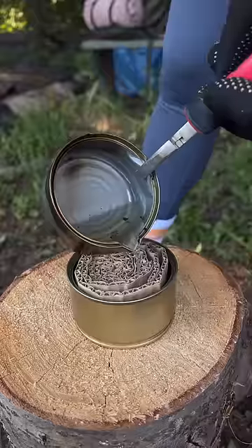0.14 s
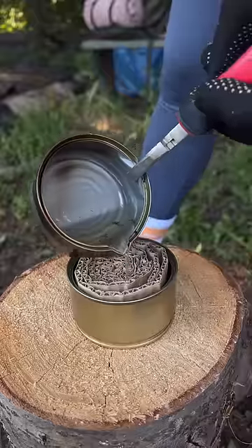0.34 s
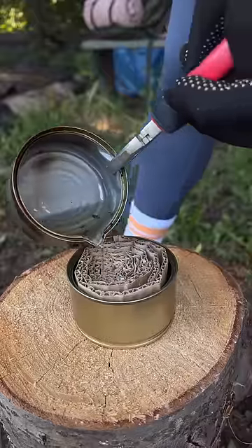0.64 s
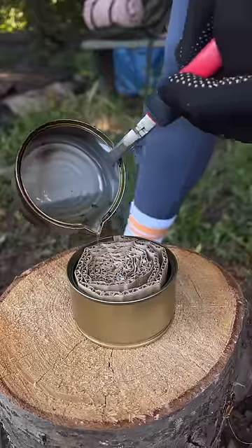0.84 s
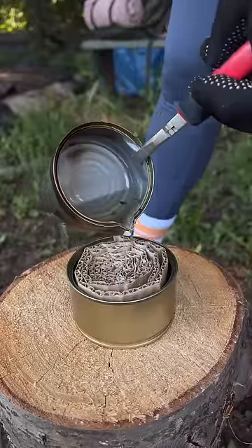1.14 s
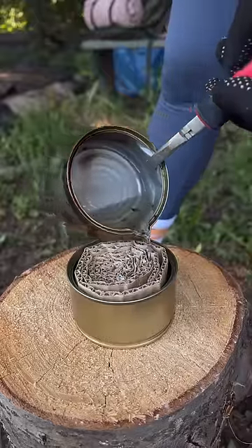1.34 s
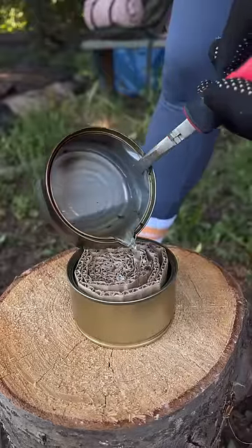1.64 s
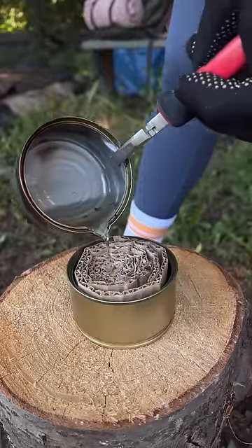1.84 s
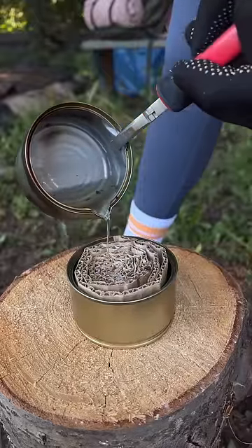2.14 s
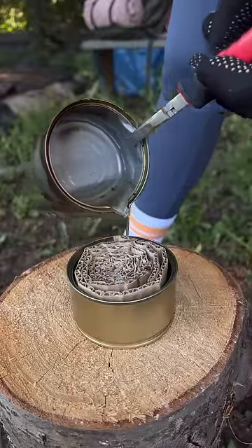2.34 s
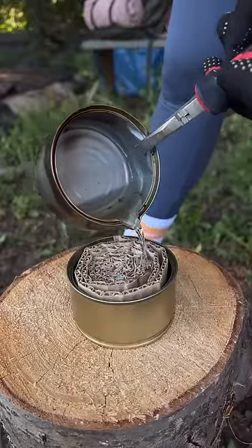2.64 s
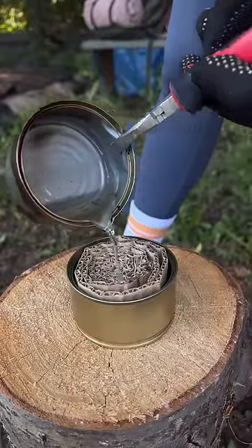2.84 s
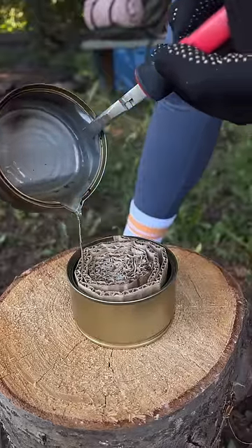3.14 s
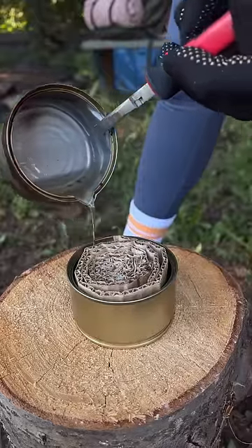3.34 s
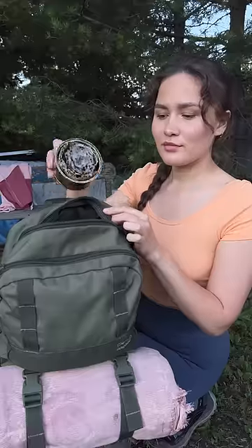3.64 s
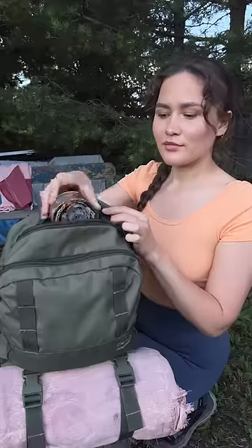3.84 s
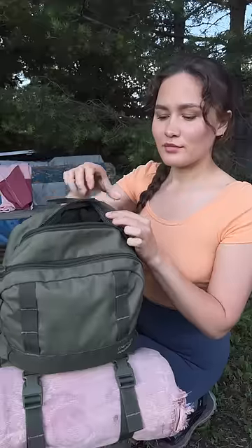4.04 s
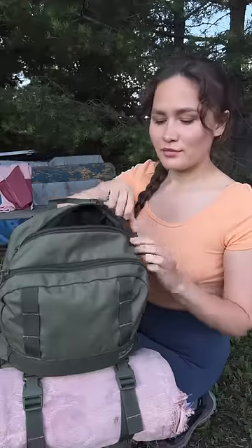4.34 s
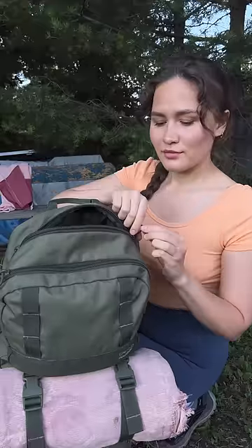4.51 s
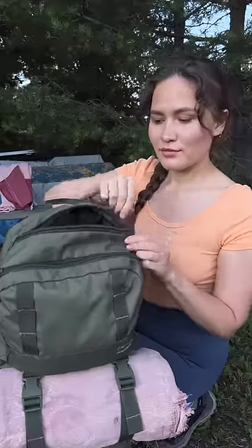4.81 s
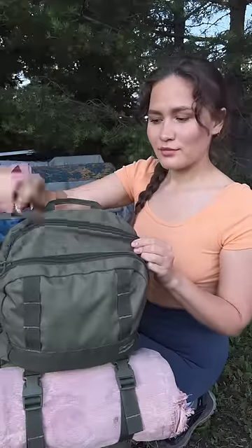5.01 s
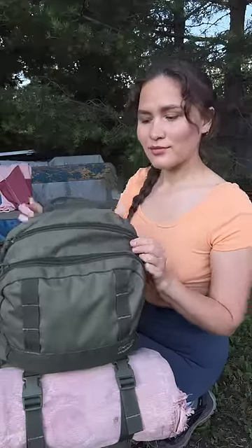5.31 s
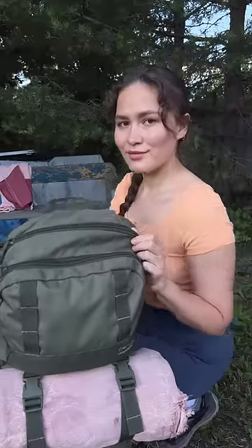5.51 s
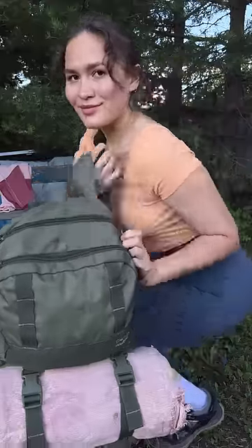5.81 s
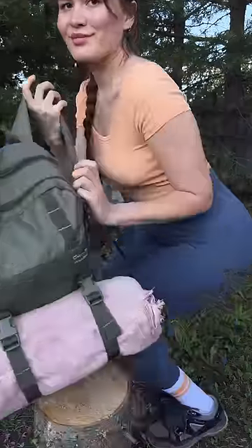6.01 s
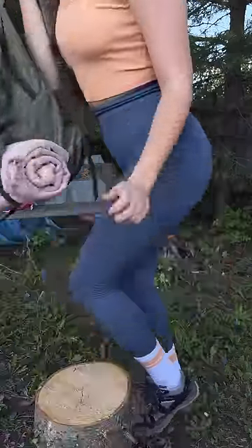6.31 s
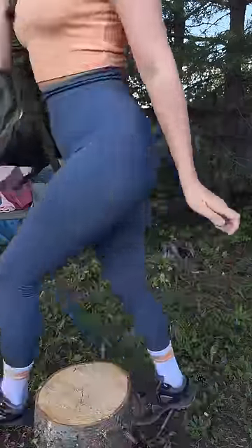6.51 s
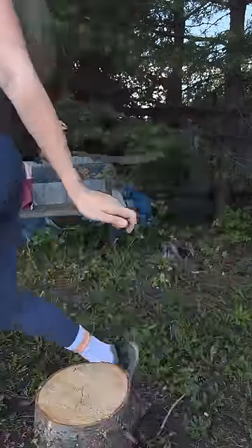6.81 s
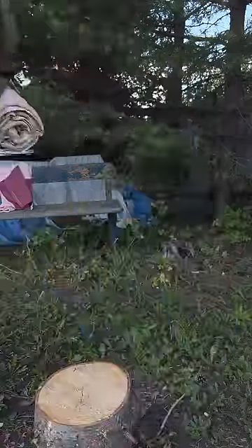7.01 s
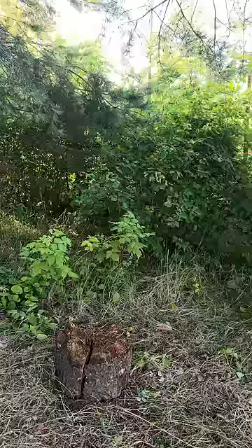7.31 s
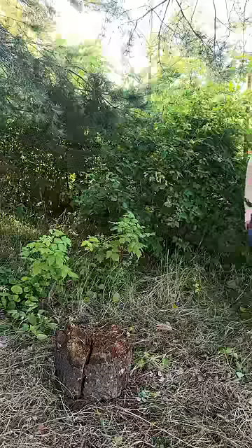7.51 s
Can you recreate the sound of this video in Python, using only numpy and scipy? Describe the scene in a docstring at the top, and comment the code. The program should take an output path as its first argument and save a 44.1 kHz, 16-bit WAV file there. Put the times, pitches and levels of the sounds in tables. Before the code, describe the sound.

A close mono microphone in a quiet garden. For the first three seconds there is mostly soft air, a very low faint hum and small birds: thin chips, downward slurs and short whistles, with farther calls behind. At about 1.35-1.5 s a pot's spout scrapes lightly on cardboard, gritty then ringing; tiny metal taps come near 2.8 s. A slightly higher distant hum joins from 3.5 s. Light handling begins at 3.8 s, and at 4.06 s a tin drops into the pack: the loudest event, a short cushioned thud with slight clatter. Birds chip again. Bumps at 4.7-4.85 s lead to a quick zipper at 4.88-5.12 s, rising in pitch and ending with a click. Birds whistle until 5.8 s. Nylon rubs, then around 5.9-6.0 s the strap drags and buckles knock as the pack lifts. Rustles, thumps and taps continue to 7.3 s with grass swishes; a twig snaps sharply at 7.58 s.

```python
"""Small birds in a quiet garden, then close to the microphone a pot's spout scrapes briefly over
cardboard as wax is poured. A tin drops into a backpack, the zipper is pulled shut, and the pack is
lifted and carried, rustling and knocking; at the end, in the woods, dry grass swishes and a twig snaps.
Random slips and struck resonances make the rubbing and the blows, tooth ticks the zipper, gliding
sines the birds, and filtered noise with low hums the air."""
import sys
import numpy as np
from scipy import signal
from scipy.fft import rfft, irfft, next_fast_len
from scipy.io import wavfile

SR = 44100
rng = np.random.default_rng(int(sys.argv[2]) if len(sys.argv) > 2 else 0)


def waveform_to_disk(signal):
    """Save audio, clipped to [-1, 1], as 16-bit WAV at the path in sys.argv[1]."""
    frames = np.transpose(np.atleast_2d(signal))
    scaled = np.clip(frames, -1, 1) * 32767
    samples = np.round(scaled).astype(np.int16)
    wavfile.write(sys.argv[1], SR, samples)


N = 337794
T = np.arange(N) / SR


def from_db(db):
    """Amplitude factor for a level in dB."""
    return 10 ** (np.asarray(db) / 20)


def rms_one(x):
    """Scale a signal to an RMS of 1."""
    return x / np.sqrt(np.mean(x ** 2) + 1e-20)


def level(s, db):
    """Gain along a dB curve, practically silent outside it."""
    return from_db(np.interp(T, s, db, left=-150, right=-150))


def add(out, s, sound):
    """Mix a short sound in at time s."""
    at = max(round(s * SR), 0)
    out[at:at + len(sound)] += sound[:max(N - at, 0)]


def drift(rate):
    """Smooth chance with an RMS of 1, from random knots at a rate per second."""
    knots = np.arange(0, 9, 1 / rate)
    return rms_one(np.interp(T, knots, rng.standard_normal(len(knots))))


def stroke(start, end, attack_s, release_s):
    """Gain that rises by 60 dB per attack up to the start, holds, and falls by 60 dB per release."""
    before = np.maximum((start - T) / attack_s, 0)
    after = np.maximum((T - end) / release_s, 0)
    return from_db(-60 * np.minimum(before + after, 3))


def sway(s, length):
    """Half a sine that starts at s and lasts for length; zero outside."""
    out = np.zeros(N)
    add(out, s, np.sin(np.linspace(0, np.pi, max(int(length * SR), 2))))
    return out


def resonate(x, hz, width_hz):
    """A two-pole resonance with a gain of about 1 at its top."""
    r = np.exp(-np.pi * width_hz / SR)
    feed = np.array([1, 0, -1]) * (1 - r * r) / 2
    feedback = [1, -2 * r * np.cos(2 * np.pi * hz / SR), r * r]
    return signal.lfilter(feed, feedback, x + 1e-18)


def colour(x, spectrum):
    """Causal (minimum-phase) filter that follows a spectrum of (Hz, dB) points."""
    size = 2 * next_fast_len(len(x))
    hz, db = np.transpose(spectrum)
    bins = np.maximum(np.fft.rfftfreq(size, 1 / SR), 1)
    gain = from_db(np.interp(np.log(bins), np.log(hz), db))
    # folding the cepstrum on to positive times gives the minimum phase
    cepstrum = irfft(np.log(gain))
    cepstrum[1:size // 2] *= 2
    cepstrum[size // 2 + 1:] = 0
    return irfft(rfft(x, size) * np.exp(rfft(cepstrum)))[:len(x)]


def friction(per_s, spread_db):
    """Rubbing as countless tiny slips of uneven size at random moments."""
    sizes = from_db(spread_db * np.minimum(rng.exponential(1, N), 4))
    slipping = rng.random(N) < per_s / SR
    return rms_one(rng.standard_normal(N) * sizes * slipping)


# the hand pulls the zipper: time_s [s], teeth_per_s [1/s], rasp_db [dB]
ZIP_PULL = [(4.877, 190, -48), (4.897, 255, -38.5), (4.928, 415, -29), (4.955, 484, -30), (4.979, 480, -26),
            (4.991, 513, -38), (5.015, 533, -31), (5.026, 600, -30.5), (5.066, 570, -31.5),
            (5.102, 340, -32.5), (5.122, 160, -70)]
# colour of the teeth's rasp: freq_hz [Hz], level_db [dB, relative]
RASP_SPECTRUM = [(820, -35), (1400, 4.5), (1770, -5), (2400, 1.5), (2710, -5), (3000, -5.5), (9050, -9.5),
                 (10900, -17), (15800, -9.5)]
# the fabric swings harder with speed, until the slider rounds the bend and the flap is held
SWING_DB, OCTAVE_DB, FULL_TEETH_PER_S = -15, -26, 430
SWING_DB_PER_OCTAVE, OCTAVE_DB_PER_OCTAVE = 16.5, 5.5
BEND_S, BEND_TAKES_S, HELD_SWING_DB, OCTAVE_FADE_DB_PER_S = 4.96, .028, -20.5, 73


def zipper(jitter=.03, flutter_db=3.0, scratch_db=-6, fabric_db=2, fabric_hz=600):
    """The slider meets the teeth at a rate set by its speed: the fabric swings and each tooth ticks."""
    s, rate, rasp_db = np.transpose(ZIP_PULL)
    per_s = np.interp(T, s, rate)
    teeth = np.cumsum(per_s * (1 + jitter * drift(250))) / SR
    speed = np.minimum(np.log2(per_s / FULL_TEETH_PER_S), 0)   # octaves below full speed
    past_bend = np.maximum(T - BEND_S, 0)
    held = np.minimum(past_bend / BEND_TAKES_S, 1)
    swing_db = SWING_DB + SWING_DB_PER_OCTAVE * speed + HELD_SWING_DB * held
    octave_db = OCTAVE_DB + OCTAVE_DB_PER_OCTAVE * speed - OCTAVE_FADE_DB_PER_S * past_bend
    # the fabric's tone: the tooth rate and its octave
    tone = 0
    for k, db in enumerate([swing_db, octave_db], 1):
        flutter = from_db(flutter_db * drift(200) * (k / 2))
        tone = tone + from_db(db) * np.sqrt(2) * np.sin(2 * np.pi * k * teeth) * flutter
    # each tooth engages a little early or late, and with a force of its own
    engaged = np.maximum.accumulate(np.floor(teeth + .04 * drift(500)))
    force = from_db(3 * drift(500) - 1) / np.sqrt(per_s / SR)
    ticks = np.diff(engaged, prepend=0) * force
    # noise that fades from each tooth to the next
    scratch = rms_one(rng.standard_normal(N) * np.exp(-2.5 * (teeth % 1)))
    rasp = rms_one(colour(ticks + from_db(scratch_db) * scratch, RASP_SPECTRUM))
    fabric = from_db(fabric_db) * rms_one(resonate(scratch, fabric_hz, 870))
    pull = stroke(s[0], s[-1], attack_s=.02, release_s=.06)
    return tone * pull + level(s, rasp_db) * (rasp + fabric) + end_stop()


# ringing of the small metal pull: pitch_hz [Hz], level_db [dB], t60_s [s]
PULL_RINGS = [(3840, -25.5, .014), (5360, -23.5, 0.026), (11240, -19, 0.023), (14400, -34, .025)]
STOP_S = 5.1005


def end_stop():
    """The slider hits its end stop and the small metal pull rings for a moment."""
    out, t = np.zeros(N), T[:SR // 10]
    ring = sum(from_db(db - 60 * t / t60) * np.sin(2 * np.pi * hz * t) for hz, db, t60 in PULL_RINGS)
    add(out, STOP_S, ring)
    return out


# level of the rustle of the handled pack, and at the end of faint rustling in the woods:
# time_s [s], level_db [dB]
RUSTLE_LEVEL = [(3.55, -93), (3.87, -54), (4.1, -56), (4.7, -54.5), (5.131, -51), (5.4, -53.5),
                (5.68, -47.5), (5.95, -35.5), (6.17, -44.5), (6.45, -45.5), (6.6, -50.5), (6.9, -38),
                (7.0, -46), (7.13, -42), (7.22, -55.5), (7.66, -63)]
# colour of nylon against the body: freq_hz [Hz], level_db [dB, relative]
CLOTH_SPECTRUM = [(45, -38), (80, 2.5), (180, 2.5), (400, 6.5), (520, -3), (720, -1), (1500, -9.5),
                  (2500, -13), (4000, -47)]
# colour of nylon sliding on nylon: freq_hz [Hz], level_db [dB, relative]
SLIDING_SPECTRUM = [(880, 0), (1500, -0.5), (2160, -6), (2710, -2), (4180, -2.5), (5240, -9), (6710, -8.5),
                    (14700, -20), (15800, -28)]
# colour of the dragging strap: freq_hz [Hz], level_db [dB, relative]
STRAP_SPECTRUM = [(47, -55), (80, -14), (107, -16), (181, -10.5), (276, -2), (640, -6.5), (891, -5),
                  (974, -9.5), (1660, -12), (1770, -2), (1930, -11.5), (2630, -16), (5350, -30.5),
                  (6380, -32), (15800, -46)]
# the strap drags taut as the pack is lifted
HEAVE_S, HEAVE_END_S, HEAVE_DB = 5.902, 6.012, -25.5


def rustling(body_db=-1, swish_db=-7, catch_db=1.2, crease_db=-6):
    """Nylon catches and slides, creases pop, the strap drags under the weight; faint rustling ends it."""
    pops = resonate(friction(per_s=130, spread_db=1.1), 670, 1040)
    creases = rms_one(resonate(pops, 940, 3300))
    cloth = rms_one(colour(friction(per_s=900, spread_db=-3.0), CLOTH_SPECTRUM))
    sliding = rms_one(colour(friction(per_s=7400, spread_db=-1), SLIDING_SPECTRUM))
    strap = rms_one(colour(friction(per_s=3000, spread_db=2.5), STRAP_SPECTRUM))
    fabric = from_db(body_db) * cloth + from_db(crease_db) * creases + from_db(swish_db) * sliding
    rustle = level(*np.transpose(RUSTLE_LEVEL)) * fabric
    heave = from_db(HEAVE_DB) * stroke(HEAVE_S, HEAVE_END_S, attack_s=0.057, release_s=0.05) * strap
    return (rustle + rubs(sliding) + heave) * from_db(catch_db * drift(70))


# nylon slides over nylon in strokes: middle_s [s], length_s [s], level_db [dB], top_ribs_per_s [1/s]
RUB_STROKES = [(5.631, 0.39, -48, 1500), (5.819, 0.13, -41, 2500), (6.13, 0.21, -43, 3000),
               (6.42, .42, -44.5, 5000), (6.696, .13, -43.5, 1700), (7.122, 0.55, -50.5, 2000)]


def rubs(sliding, rib_db=-10, slow_share=.75):
    """Each stroke speeds up and slows down: its swish swells, and the ribs of the weave rub faster."""
    swell, rate = np.zeros(N), np.zeros(N)
    for s, length, db, ribs_per_s in RUB_STROKES:
        speed = sway(s - length / 2, length)
        swell += from_db(db) * speed
        rate = np.where(speed > 0, ribs_per_s * (slow_share + (1 - slow_share) * speed), rate)
    phase = 2 * np.pi * np.cumsum(rate * np.exp(.16 * drift(700))) / SR
    ribs = rms_one(drift(900) * np.sin(phase))
    return swell * (sliding + from_db(rib_db) * ribs)


# ringing of the loaded pack: pitch_hz [Hz], level_db [dB, relative], t60_s [s]
DROP_RINGS = [(225, -32, 0.019), (300, 2, 0.025), (400, 1, 0.021), (655, -20, 0.026), (1016, -28, 0.046),
              (1580, -19.5, 0.019)]
# the tin's contents clatter as it touches, slides and settles: time_s [s], level_db [dB]
TIN_CLATTERS = [(4.035, -42), (4.044, -44), (4.065, -32.5)]
DROP_S, DROP_PEAK_DB, CLATTER_T60_S = 4.0588, -2, 0.055


def tin_drop(contact_s=0.0018, lag_s=0.0012):
    """A cushioned blow sets the loaded pack ringing for a few cycles, with a light clatter."""
    out, t = np.zeros(N), T[:SR // 5]
    thud = 0
    for hz, db, t60 in DROP_RINGS:
        thud = thud + from_db(db - 60 * t / t60) * np.sin(2 * np.pi * hz * (t - lag_s))
    thud = thud * (1 - np.exp(-(t / contact_s) ** 2))   # the cushion softens the onset
    thud = signal.sosfilt(signal.butter(4, 150, "high", fs=SR, output="sos"), thud)
    add(out, DROP_S, from_db(DROP_PEAK_DB) * thud / np.abs(thud).max())
    clatter = sum(from_db(db) * stroke(s, s, attack_s=0.0096, release_s=CLATTER_T60_S)
                  for s, db in TIN_CLATTERS)
    contents = resonate(friction(per_s=4200, spread_db=-5.0), 1040, 610)
    return out + clatter * rms_one(resonate(contents, 900, 3100))


# soft thumps of load and hands: start_s [s], peak_db [dB], pitch_hz [Hz], t60_s [s]
SOFT_THUMPS = [(3.831, -35.5, 400, 0.08), (4.040, -21.5, 487, 0.069), (4.18, -38, 453, 0.044),
               (4.716, -23, 380, 0.04), (4.733, -22, 390, 0.039), (4.7754, -17, 745, .008),
               (4.829, -25.5, 244, 0.033), (4.85, -28, 300, 0.041), (5.119, -27.5, 326, 0.022),
               (5.197, -28.5, 447, 0.044), (5.232, -29.5, 368, 0.03), (5.459, -34, 335, .05),
               (5.472, -26, 370, 0.055), (5.691, -23, 530, 0.028), (5.788, -22.5, 450, 0.019),
               (6.011, -14.5, 664, 0.079), (6.252, -23.5, 367, 0.12), (6.262, -21, 408.6, 0.035),
               (6.754, -26, 680, 0.028), (6.797, -30.5, 300, 0.052), (6.885, -20.5, 387, 0.038),
               (7.078, -19, 716, 0.056), (7.131, -18, 674, 0.08)]
# hard taps of pot, buckles and twigs: start_s [s], peak_db [dB], pitch_hz [Hz], t60_s [s]
HARD_TAPS = [(2.761, -43.5, 2180, .013), (2.815, -40.5, 1920, 0.027), (3.925, -35.5, 990, .017),
             (4.034, -35.5, 2100, .02), (4.802, -32.5, 900, 0.05), (5.141, -31, 696, 0.012),
             (5.7602, -19.5, 695, 0.028), (5.9021, -14.5, 980, 0.0039), (5.975, -16, 1390, .026),
             (6.64, -28, 890, .012), (6.710, -17, 876, 0.0058), (6.7177, -23, 970, .012),
             (6.824, -25.5, 700, .013), (6.865, -18.5, 1290, 0.014), (6.925, -25, 1490, 0.095),
             (7.3031, -25, 1114, .004)]
# level of the tick on top; for taps at a pitch of 1 kHz, as a harder tap is both higher and brighter
THUMP_TREBLE_DB, TAP_TREBLE_DB, TAP_DB_PER_OCTAVE = -26, -18.5, 8


def knocks(rows, treble_db, db_per_octave=0, damping=0.34, rattle=0.31, tick_hz=3500):
    """A push and a short settling rattle excite one broad resonance, with a tick on top."""
    out, t = np.zeros(N), T[:SR // 5]
    for s, db, hz, t60 in rows:
        settle, crackle = rng.standard_normal((2, len(t))) * from_db(-60 * t / t60)
        push = rattle * settle + 2 * (t == 0)
        thump = rms_one(resonate(resonate(push, hz, damping * hz), hz, 3 * hz))
        tick = rms_one(resonate(crackle * np.exp(-t / 0.0054), tick_hz, 4700))
        tick_db = treble_db + db_per_octave * np.log2(hz / 1000)
        knock = thump + from_db(tick_db) * tick
        add(out, s, from_db(db) * knock / np.abs(knock).max())
    return out


# the pot's resonances: pitch_hz [Hz], width_hz [Hz], level_db [dB, relative]
POT_RINGS = [(1140, 144, 6.5), (1770, 230, -4), (2165, 94, 3), (3150, 1000, -6.5), (4200, 200, -11.5),
             (7200, 2300, -14.5), (9050, 550, -13), (11900, 1300, -21)]
# the spout drags over the cardboard, first with its lip and then harder with its rim
SCRAPE_S, RIM_S, SCRAPE_END_S, LIP_DB, RIM_DB = 1.339, 1.413, 1.474, -42.5, -38


def spout(rim_takes_s=.02, lip_db=-15, rim_db=-1.5, grit_db=-6, judder_db=2.5):
    """Uneven slips ring the pot; as the rim bears down the ringing shifts to its lowest mode."""
    slips = friction(per_s=2400, spread_db=-0.7) * from_db(judder_db * drift(150))
    pressed = np.clip((T - RIM_S) / rim_takes_s + .5, 0, 1)
    rings = 0
    for k, (hz, width, db) in enumerate(POT_RINGS):
        share_db = lip_db + (rim_db - lip_db) * pressed if k == 0 else -3 * pressed
        gain = from_db(db + share_db + 2 * drift(59.9))
        rings = rings + gain * resonate(slips, hz, width) * (-1) ** k   # alternate polarity
    grit = from_db(grit_db) * rms_one(resonate(slips, 3400, 4300))
    drag = stroke(SCRAPE_S, SCRAPE_END_S, attack_s=0.1, release_s=0.06)
    contact = from_db(LIP_DB + (RIM_DB - LIP_DB) * pressed) * drag
    return (rms_one(rings) + grit) * contact


# brushes past grass and cloth: start_s [s], length_s [s], level_db [dB]
BRUSH_PASSES = [(3.807, 0.17, -59.5), (4.33, 0.13, -57.5), (6.032, 0.13, -47), (6.272, 0.22, -42.5),
                (6.632, 0.07, -40.5), (7.198, 0.61, -52), (7.307, 0.19, -44.5)]
# colour of the brushes: freq_hz [Hz], level_db [dB, relative]
GRASS_SPECTRUM = [(410, -25), (700, 1), (1040, 3), (1240, -4), (1360, 5), (2230, 3.5), (6510, 7.5),
                  (15800, 6.5)]


def brushes():
    """Countless slips against grass and cloth make short bright swishes that swell and fade."""
    swell = sum(from_db(db) * sway(s, length) ** 2 for s, length, db in BRUSH_PASSES)
    return swell * rms_one(colour(friction(per_s=11000, spread_db=2.0), GRASS_SPECTRUM))


# sharp snaps of slider, buckle and twig: start_s [s], level_db [dB over the first 3 ms], top_hz [Hz]
SHARP_SNAPS = [(4.9792, -26.5, 3000), (5.1004, -18.5, 7000), (5.976, -24, 6000), (6.8245, -33, 5000),
               (7.5805, -20, 14000)]
# colour of a crack: freq_hz [Hz], level_db [dB, relative]
CRACK_SPECTRUM = [(150, -65), (250, -12), (672, -7), (1690, 0), (2080, -10.5), (2430, -7.5), (3810, -13),
                  (5120, -5), (6300, -7), (8170, -1.5), (10400, -10), (14200, -1.5), (15800, -21)]


def snaps(crack_s=0.0012, splinter_db=-25, splinter_s=0.0078):
    """A millisecond crack, then a little splintering."""
    out, t = np.zeros(N), T[:SR // 10]
    attack = t < .003
    for s, db, top_hz in SHARP_SNAPS:
        decay = np.exp(-t / crack_s) + from_db(splinter_db) * np.exp(-t / splinter_s)
        burst = colour(rng.standard_normal(len(t)) * decay, CRACK_SPECTRUM)
        snap = signal.sosfilt(signal.butter(1, min(top_hz, .4 * SR), fs=SR, output="sos"), burst)
        add(out, s, from_db(db) * snap / np.std(snap[attack]))
    return out


# slurs swoop down on to a pitch and fade there: start_s [s], length_s [s], final_hz [Hz], level_db [dB]
BIRD_SLURS = [(0.042, .11, 6050, -69), (0.208, .13, 6500, -64), (.245, .09, 3250, -65),
              (0.856, 0.11, 3120, -56.5), (1.123, 0.18, 3315, -58), (1.651, 0.31, 3148, -56)]
SLUR_OCTAVES, SLUR_S, SLUR_FADE_DB = .5, .03, 8.5
# chips, short arches of pitch: start_s [s], top_hz [Hz], level_db [dB]
BIRD_CHIPS = [(.385, 8540, -59), (.42, 8600, -60.5), (.52, 8700, -66), (.64, 8040, -56.5),
              (.725, 7700, -54), (1.105, 5260, -67), (4.133, 6750, -56.5), (4.495, 6740, -56),
              (4.595, 7100, -58.5), (4.669, 6080, -54), (4.762, 6900, -54)]
CHIP_S, CHIP_OCTAVES = .062, .22
# whistles, held with a slight rise: start_s [s], length_s [s], pitch_hz [Hz], level_db [dB]
BIRD_WHISTLES = [(.94, .08, 2880, -67), (0.983, 0.06, 3850, -55), (1.067, .04, 4250, -54),
                 (1.48, .11, 3010, -59.5), (5.12, .14, 7260, -62), (5.353, 0.132, 3760, -55.5),
                 (5.526, 0.049, 4510, -51.5), (5.602, 0.2, 4130, -55)]
WHISTLE_RISE_OCTAVES = 0.067
# farther birds call at random in mostly rising glides of uneven steepness
FAR_UNTIL_S, FAR_GAP_S, FAR_NOTE_S, FAR_HZ = 3.1, .17, 0.074, 4190
FAR_OCTAVES, FAR_DB, FAR_FADE_DB_PER_S = 0.25, -65.5, 4


def birds(waver=0.016, flutter_db=3):
    """Thin, wavering whistles in a few shapes, smeared by the trees."""
    out, wobble, flutter = np.zeros(N), drift(300), drift(100)

    def sing(s, length, hz, db, octaves, fade_db=0):
        """One note; octaves gives its bend over the note's course from 0 to 1."""
        on = (T >= s) & (T < s + length)
        u = (T[on] - s) / length
        pitch = hz * 2 ** octaves(u) * (1 + waver * wobble[on])
        note_db = db - fade_db * u + flutter_db * flutter[on]
        swell = np.sqrt(2 * np.abs(np.sin(np.pi * u))) * from_db(note_db)
        add(out, s, swell * np.sin(2 * np.pi * np.cumsum(pitch) / SR))

    for s, length, hz, db in BIRD_SLURS:
        sing(s, length, hz, db, lambda u: SLUR_OCTAVES * np.exp(-u * length / SLUR_S), SLUR_FADE_DB)
    for s, hz, db in BIRD_CHIPS:
        sing(s, CHIP_S, hz, db, lambda u: -CHIP_OCTAVES * (2 * u - 1) ** 2)
    for s, length, hz, db in BIRD_WHISTLES:
        sing(s, length, hz, db, lambda u: WHISTLE_RISE_OCTAVES * (u - .5))
    for k, (late, high, way) in enumerate(rng.uniform(-1.1, 1, size=(30, 3))):
        s = FAR_GAP_S * (k + 1 + late / 2)
        if s < FAR_UNTIL_S:
            hz, db = FAR_HZ * (1 + .12 * high), FAR_DB - FAR_FADE_DB_PER_S * s
            sing(s, FAR_NOTE_S, hz, db, lambda u: (1 + way) * FAR_OCTAVES * (u - .5))
    return garden(out, t60=0.55, wet_db=-7)


# colour of the still air: freq_hz [Hz], level_db [dB, relative]
AIR_SPECTRUM = [(15, -47), (25, -7), (55, -2.5), (76, -7.5), (316, -17), (414, -18), (542, -14.5),
                (654, -14.5), (749, -16.5), (929, -20.5), (1060, -21.5), (2590, -31.5), (3300, -31.5),
                (15800, -35.5)]
AIR_DB = -54
# distant motor hums: start_s [s], end_s [s], pitch_hz [Hz], level_db [dB]
MOTOR_HUMS = [(0, 10, 49.4, -63.5), (3.5, 7.2, 125.1, -57.5)]


def background(hum_wander=1.66, waver_db=2):
    """Soft outdoor hush of coloured noise, with low hums that waver in phase and level."""
    out = from_db(AIR_DB) * rms_one(colour(rng.standard_normal(N), AIR_SPECTRUM))
    for start, end, hz, db in MOTOR_HUMS:
        hum = np.sqrt(2) * np.sin(2 * np.pi * hz * T + hum_wander * drift(15))
        hum = hum * from_db(waver_db * drift(8.8))
        fade = np.clip(np.minimum(T - start, end - T) * 10, 0, 1)   # 0.1 s at each end
        out += from_db(db) * hum * fade
    return out


def garden(x, t60, wet_db):
    """Ground, trunks and leaves scatter a faint tail with little bass."""
    t = T[:SR // 2]
    tail = rng.standard_normal(len(t)) * from_db(-60 * t / t60) * (t > .004)
    tail = signal.sosfilt(signal.butter(1, [700, 7000], "band", fs=SR, output="sos"), tail)
    return x + from_db(wet_db) * signal.fftconvolve(x, tail / np.linalg.norm(tail))[:N]


def scene():
    """Pot, pack, grass and knocks close to the microphone; birds and still air behind them."""
    blows = knocks(SOFT_THUMPS, THUMP_TREBLE_DB) + knocks(HARD_TAPS, TAP_TREBLE_DB, TAP_DB_PER_OCTAVE)
    near = zipper() + rustling() + tin_drop() + blows + spout() + brushes() + snaps()
    return (garden(near, t60=0.26, wet_db=-17) + birds() + background())[None]


CUTOFF_HZ = 15900


def record(dry):
    """One microphone channel, its top cut steeply by a low-pass filter."""
    return signal.sosfilt(signal.ellip(10, .1, 70, CUTOFF_HZ, fs=SR, output="sos"), dry)


dry = scene()
out = record(dry)
waveform_to_disk(out)
```